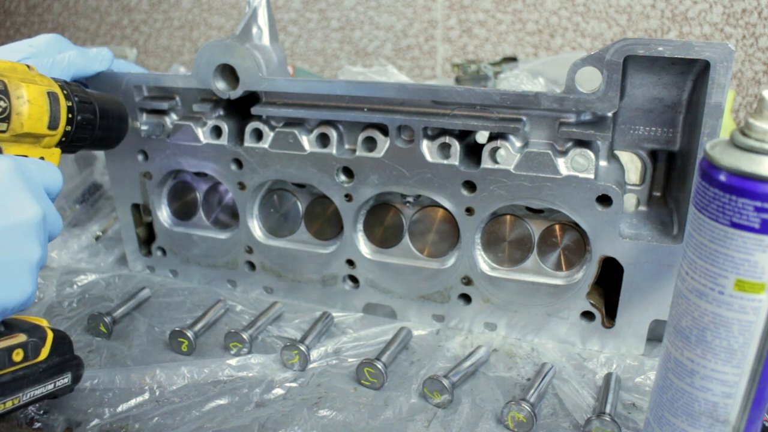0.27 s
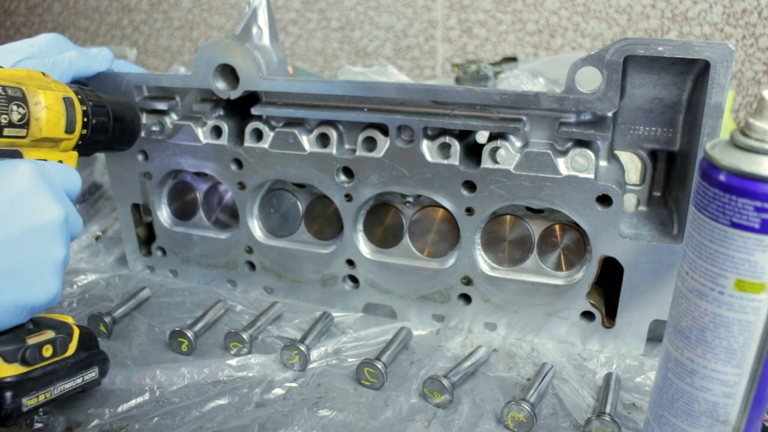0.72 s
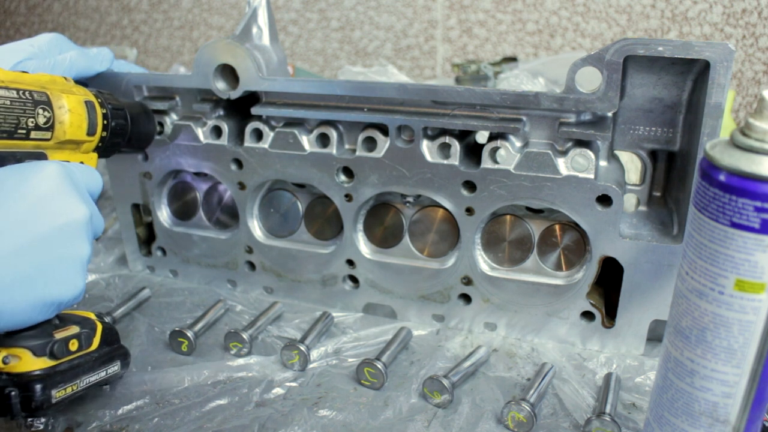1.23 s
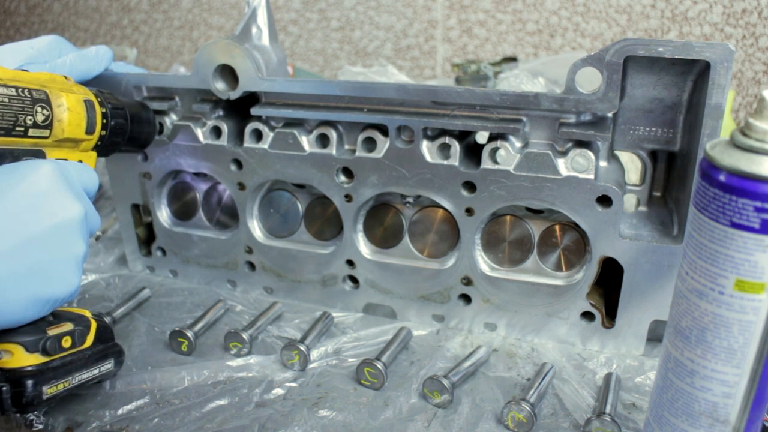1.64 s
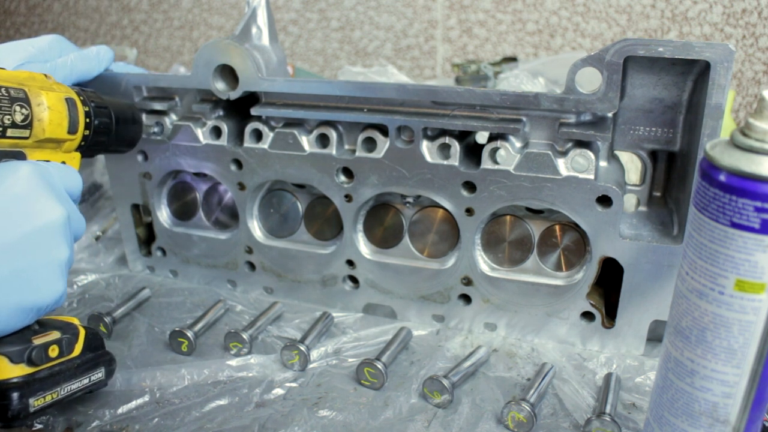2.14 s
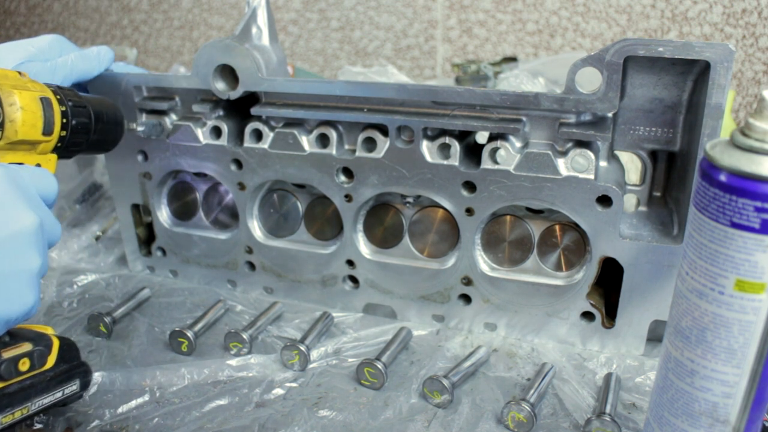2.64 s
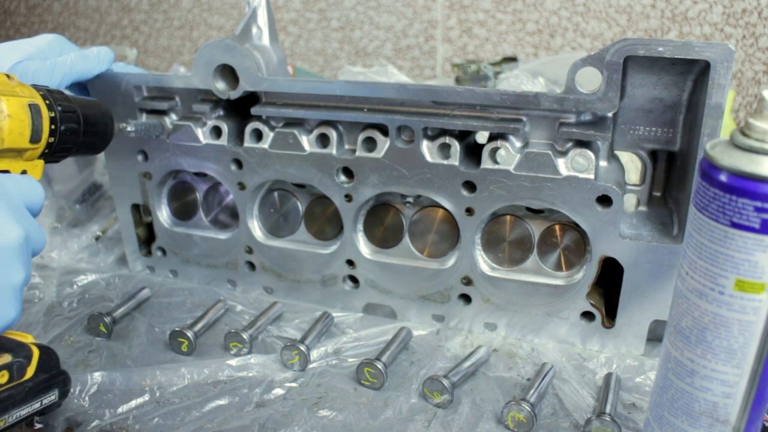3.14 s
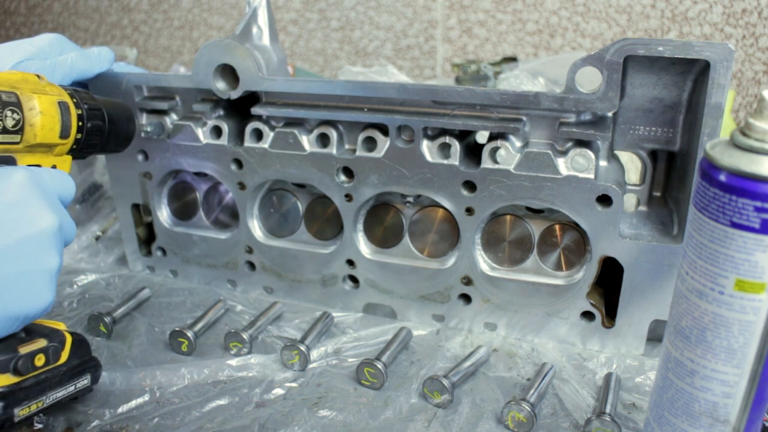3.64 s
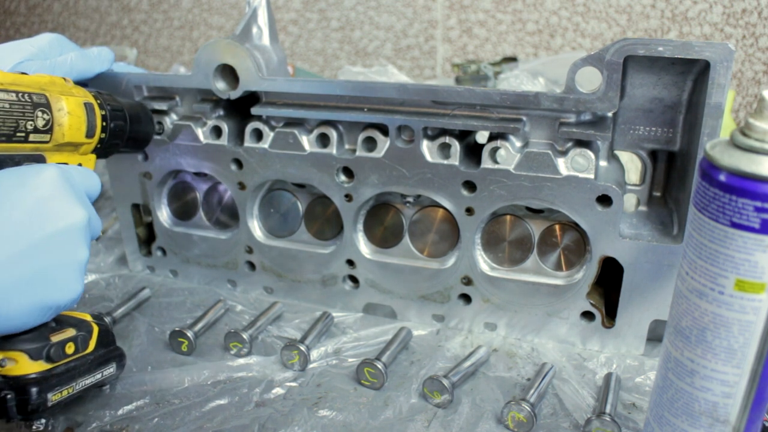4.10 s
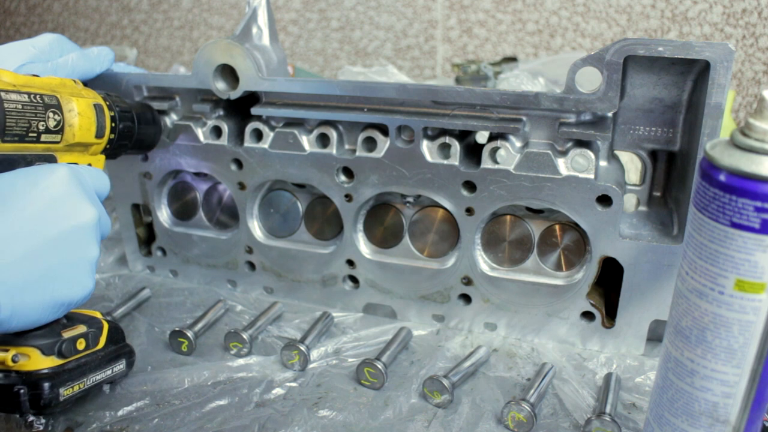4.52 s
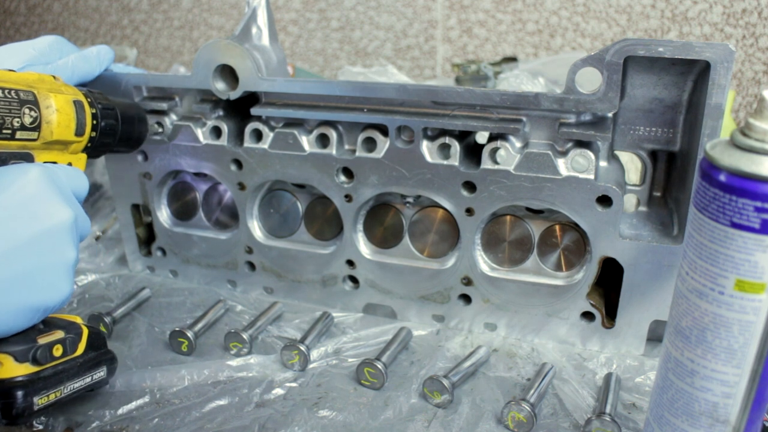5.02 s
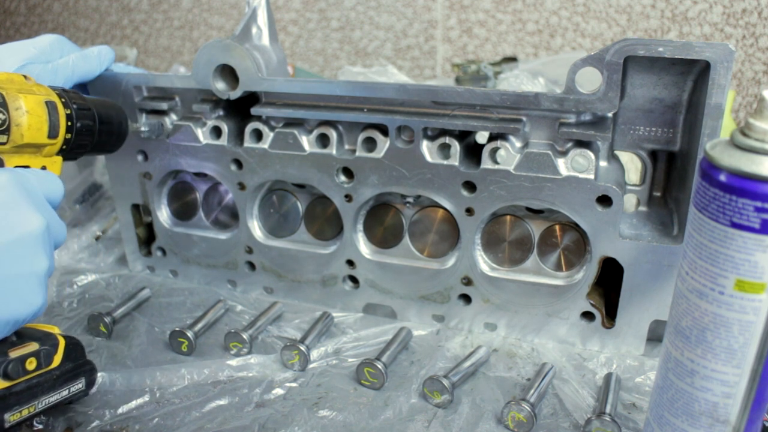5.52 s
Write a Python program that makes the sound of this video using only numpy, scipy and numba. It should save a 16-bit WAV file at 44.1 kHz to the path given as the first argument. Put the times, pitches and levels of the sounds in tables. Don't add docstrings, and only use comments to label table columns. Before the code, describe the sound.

Close microphone on a small electric drill in a quiet workshop. Motor and gears give a buzzing, slightly fluttering high whine over scratchy bristle and fan hiss. There is a quick rev at the start, faint airy whistles as the brush slides, a short drop in speed just after the middle with rougher motor scrape, then a steady run, cut off while still going.

```python
import sys
import numpy as np
from scipy import signal
from scipy.fft import rfft, irfft
from scipy.io import wavfile
from scipy.ndimage import uniform_filter1d
from numba import njit

SR = 44100
rng = np.random.default_rng(int(sys.argv[2]) if len(sys.argv) > 2 else 0)


def waveform_to_disk(signal):
    frames = np.transpose(np.atleast_2d(signal))
    scaled = np.clip(frames, -1, 1) * 32767
    samples = np.round(scaled).astype(np.int16)
    wavfile.write(sys.argv[1], SR, samples)


def convert_level_to_amplitude(level_db):
    exponent = np.asarray(level_db, float) / 20
    return 10 ** exponent


N = 253910
BLOCK = 128
PLANET = .2133

# time_s, shaft_turns_per_s
RUNNING_SPEED = [(0, 184.3), (1.25, 184), (1.53, 191.2), (1.82, 196.5), (2.05, 197.9), (2.42, 204.5),
                 (2.63, 197.7), (2.88, 207.3), (3.46, 193.1), (3.67, 203.2), (4.17, 202), (4.53, 205.4),
                 (4.69, 199.4), (5.02, 191.8), (5.32, 192.8), (5.5, 195.9), (5.66, 195.8), (5.76, 200.2)]
# time_s, extra_turns_per_s
SPIN_UP = [
    (0, -54),
    (.13, -57),
    (.178, 3),
    (.215, 3),
    (.25, 57),
    (.28, 67),
    (.385, 68),
    (.43, 44),
    (.54, 18.5),
    (.67, 0),
]
# time_s, armature_db, gear_db, pole_whine_db, bristle_db
DRIVE = [(0, -6, -5, -70, -46.5), (.11, -5, -2, -68, -45), (.18, -4, 3, -50, -41.5),
         (.3, 0, 1, -56.5, -39.5), (.45, -1, -1, -46, -41.5), (.7, 1.5, 6, -52, -44),
         (1.25, 0.5, 3, -52.5, -44), (1.5, 3, 2, -48, -43.5), (2.0, 3, 3.5, -47.5, -42.5),
         (2.45, 2, 4.5, -49.5, -42.5), (2.75, 2.5, 1, -48, -44.5), (3.0, 2, -9.5, -48.5, -44.5),
         (3.2, -4, -5.5, -59.5, -46.5), (3.45, 1, 1, -47.5, -44), (3.8, 4, 5, -47, -44),
         (4.62, 4, 1, -45.5, -45), (5.2, 1, 3, -51, -43), (5.76, 0.5, 0, -47, -44.5)]
# time_s, touching_share
CONTACT = [
    (0, .45),
    (.2, .3),
    (.7, 1),
    (2.72, 0.92),
    (2.82, .1),
    (3.1, 0),
    (3.32, .1),
    (3.45, 0.68),
    (3.9, 1),
]
# multiple; the first is the pole whine, whose level_db follows DRIVE
LOUD_MULTIPLES = [3, 6, 12, 25, 10.82, 11.46, 22.28]
LOUD_DB = [0, -66, -63, -67, -67, -65, -64.5]
LOUD_RATTLE = [.08, 0.8, 0.2, 0.2, 0.12, 0.12, 0.6]
# multiple, level_db
ARMATURE = [(1.0, -76), (2.0, -76.5), (4.0, -69.5), (5.0, -72), (7.0, -74), (8.0, -69), (9.0, -69),
            (10.0, -73.5), (13.0, -66.5), (15.0, -69.5), (16.0, -71.2), (17.0, -76.0), (18.0, -66),
            (21.0, -72), (23.0, -74.4), (24.0, -73.5), (26.0, -74.7), (27.0, -72.5), (28.0, -70),
            (29.0, -71.8), (30.0, -81), (31.0, -66.5), (33.0, -72.1), (36.0, -76), (37.0, -77), (40.0, -78),
            (54.0, -80.1), (57.0, -81.1), (58.0, -83), (60.0, -77.0)]
# multiple, level_db
GEARS = [(2.27, -79.5), (2.82, -80), (3.1, -67), (3.18, -73.5), (6.2, -66.5), (10.46, -74.0),
         (21.64, -67.5), (33.74, -76), (34.4, -76)]
# centre_hz, width_hz, peak_db
CASE_RING = [(605, 40.0, 3.0), (1180.4, 25.0, 8.5), (1993, 69, 10.5), (2160.0, 168, 8.0), (2370, 98, 5.5),
             (3140, 160.0, 6.0), (3454.0, 140, 5.5), (4420, 230, 4.0), (4940, 672.0, 9.0),
             (5170, 28.0, 8.5), (5343.0, 64.0, 7.0), (5434.0, 160, 5.5), (5880, 250, 6.5), (6700, 144.0, 7)]
# centre_s, half_length_s, multiple, change_db
MULTIPLE_SHIFTS = [(0.0, 0.18, 15.0, 15.5), (0.2, 0.28, 25.0, -12), (0.35, 0.12, 3.18, 8),
                   (0.4, 0.17, 22.28, -6), (0.6, 0.1, 12.0, -14), (0.9, 0.18, 25.0, 8), (1.0, 0.2, 3.0, -7),
                   (1.1, 0.3, 11.46, 5.5), (1.1, 0.3, 15.0, 3), (2.5, 0.18, 18.0, -14), (2.6, 0.3, 21.64, 9.5),
                   (2.85, 0.2, 26.0, 7), (2.85, 0.32, 13.0, -14), (3.05, 0.1, 12.0, -12), (3.05, 0.14, 3.1, 15),
                   (3.15, 0.46, 11.46, -12), (3.7, 0.5, 26.0, -9), (3.95, 0.3, 23.0, 7), (3.95, 0.26, 28.0, -9),
                   (4.0, 0.5, 6.0, -15), (4.25, 0.2, 21.64, -14), (4.3, 0.3, 24.0, 5), (4.35, 0.18, 8.0, -14),
                   (4.75, 0.19, 10.0, -16), (4.8, 0.26, 11.46, 4), (4.8, 0.3, 23.0, -14), (5.1, 0.44, 12.0, 4),
                   (5.15, 0.18, 10.82, -9), (5.35, 0.3, 22.28, 5), (5.55, 0.092, 11.46, -14), (5.35, .4, 9, -9),
                   (4.45, .3, 7, -6), (4.1, .15, 10, -7), (5.1, .4, 15, -7), (3.5, .1, 15, -9), (.3, .1, 9, -7),
                   (1.0, .3, 6, -6), (5.0, .7, 8, 4), (1.6, .25, 22.28, -5), (5.6, .2, 6, -5),
                   (.15, .2, 11.46, -6), (3.2, .15, 25, -7), (.25, .04, 3, 6), (5.65, .15, 21.64, 5),
                   (3.6, .2, 24, -6)]
# centre_s, half_length_s, multiple, change_db
MULTIPLE_SWELLS = [(.33, .05, 3, -6), (2.92, .15, 25, -4), (.6, .1, 6, -10), (.95, .35, 10.82, 2),
                   (1.5, .4, 4, -11), (2.25, .2, 6, 1), (1.75, .3, 11.46, 4), (2.0, .3, 10, -8),
                   (2.0, .2, 27, -8), (2.4, .35, 22.28, 3), (2.85, .12, 6, 2), (2.9, .25, 33, -8),
                   (2.9, .2, 26, -5), (2.9, .2, 18, -8), (0, .13, 2, -11), (2.6, .4, 1, -5), (3.4, .1, 12, 3),
                   (3.21, .08, 6, 7), (3.2, .15, 9, 10), (3.2, .2, 31, -8), (3.25, .2, 2, -8),
                   (.35, .15, 1, -2), (0, .12, 3, -5), (3.25, .035, 3, -8), (3.08, .04, 3, 4),
                   (.7, .4, 33, -4), (1.0, .3, 3.1, -6), (3.07, .14, 3.1, -10), (4.55, .35, 22.28, -4),
                   (0, .15, 2.27, -12), (0, .15, 2.82, -10), (1.06, .025, 3, -8), (1.26, .025, 3, -9),
                   (1.46, .035, 3, 3), (1.54, .02, 3, -5), (.62, .02, 3, -5), (1.1, .35, 28, 5),
                   (1.7, .2, 8, 5), (3.5, .1, 22.28, 2), (3.9, .3, 29, -6), (1.0, .25, 24, -7),
                   (4.96, .025, 3, -9), (5.37, .03, 3, -8), (0, .13, 1, -11)]
# centre_s, half_length_s, multiple, level_db
PASSING = [(0, .13, 9, -60), (.05, .08, 10.75, -59), (0, .12, 18, -60), (0, .13, 22.5, -56),
           (0, .12, 26, -59), (0, .13, 33, -61), (0, .12, 40, -61), (0, .12, 41.6, -60), (.03, .06, 6, -62),
           (.06, .08, 7, -64), (.24, .03, 4, -58), (.33, .06, 6, -57), (.29, .05, 19, -51),
           (.35, .05, 20, -52), (.34, .07, 9, -54), (.42, .09, 12, -55), (.5, .08, 9, -56),
           (.56, .06, 21, -56), (.78, .16, 31, -55), (.62, .1, 25, -55), (.75, .1, 29, -55),
           (.65, .08, 16, -60), (.45, .08, 7, -59), (.2, .04, 22.28, -55), (.33, .06, 11.46, -53),
           (.46, .07, 11.46, -54), (2.86, .09, 26, -54), (2.9, .1, 29, -55), (2.8, .1, 31, -61),
           (3.0, .07, 28, -55), (3.02, .06, 18, -60), (2.95, .14, 7, -57), (3.0, .07, 8, -60),
           (2.98, .06, 23, -61), (3.03, .05, 31, -60), (3.09, .05, 30, -61), (3.2, .14, 9, -58),
           (3.26, .06, 15, -58), (3.22, .07, 10.78, -61), (3.25, .06, 13.2, -61), (3.25, .06, 36, -62),
           (3.2, .08, 4, -62), (3.15, .05, 34, -62), (3.33, .04, 32, -61), (3.41, .05, 28, -58),
           (3.44, .09, 31, -58), (3.44, .06, 18, -59), (3.37, .05, 11, -51), (3.4, .06, 10, -57)]
# centre_s, half_length_s, multiple, level_db
LASTING = [(1.1, .4, 19, -59), (1.1, .18, 35, -63), (1.0, .4, 38, -68), (1.05, .45, 28, -52),
           (1.4, .45, 31, -55), (2.2, .4, 31, -60), (1.05, .35, 25, -53), (1.95, .6, 25, -51),
           (.9, .3, 29, -57), (.92, .16, 18, -54), (.3, .08, 21, -54), (.4, .06, 22.28, -52),
           (3.12, .08, 8, -60), (3.1, .06, 33, -61), (1.7, .4, 27, -56), (1.2, .3, 47, -70),
           (2.0, .2, 40, -67), (2.3, .35, 34, -65), (2.4, .2, 60, -67), (2.55, .25, 9, -59),
           (1.7, .2, 26, -56), (2.1, .2, 23, -57), (2.1, .4, 68, -73), (3.9, .3, 34, -60),
           (4.4, .25, 32, -63), (4.35, .2, 57, -64), (4.2, .3, 60, -65), (4.5, .18, 54, -65),
           (4.2, .4, 24, -54), (4.4, .25, 22, -58), (4.2, .6, 29, -55), (4.1, .5, 31, -59),
           (4.9, .4, 25, -54), (3.9, .3, 19, -61), (4.0, .3, 66, -73), (4.7, .25, 18, -55),
           (4.6, .25, 35, -66), (5.3, .55, 31, -54.5), (5.2, .16, 10, -57), (5.0, .25, 28, -55),
           (5.6, .2, 28, -56), (5.0, .3, 41, -69), (4.8, .3, 26, -55)]
# time_s, level_db
SCRAPE = [(0, -62), (.25, -53), (.5, -57), (.7, -64), (2.7, -61), (2.8, -52), (2.95, -50.5), (3.08, -52),
          (3.2, -56), (3.4, -56), (3.6, -61), (4.5, -57), (4.7, -57), (5.76, -66)]
# pitch_hz, level_db
HISS_COLOUR = [(35, -52), (60, -31), (107, -31), (216, -25.5), (320, -30.5), (500, -20.5), (740, -18.5),
               (1360, -15.5), (2260, -9.5), (2850, -11), (5350, -11), (7500, -18), (10000, -23),
               (13000, -19.5), (15700, -23.5)]
# centre_hz, width_hz, peak_db
CASE_MODES = [(160, 19, 4.5), (224.4, 8.9, 8), (602, 140, 5.5), (1194, 29, 6.5), (1280, 120, 3.5),
              (2006, 260, 5), (3300, 490, 1), (4470, 180, 1), (5330, 480, 2), (6630, 120, 2),
              (12200, 1000, -1)]
# centre_hz, width_hz, peak_db
FREE_RING = [(320, 160, -5), (620, 200, 4), (1050, 250, -3), (4300, 1100, -3), (5450, 800, 2.5)]
# centre_hz, control (1 hum, 2 case, 3 fizz), share
HISS_BANDS = [(120, 1, 1), (260, 3, .8), (500, 0, 1), (2500, 0, 1), (4000, 2, 1), (5600, 2, .3),
              (8200, 3, 1.3), (10500, 3, 1.3), (12000, 3, .1)]
# start_s, length_s, start_hz, end_hz,
# level_db
WHISTLES = [(0, 0.14, 1945, 1925, -56), (.205, .09, 1850, 2380, -40), (0.36, .11, 5500, 5000, -42.5),
            (0.26, .16, 4700, 5050, -44.5), (.17, .075, 4050, 4550, -54), (.235, .13, 5250, 5750, -46),
            (.28, .14, 2800, 2980, -47.5), (0.385, 0.11, 2160, 1990, -42.5), (.5, .1, 3050, 3300, -52),
            (.54, .09, 4450, 4150, -48), (.68, 0.75, 3470, 3600, -57), (.697, .1, 7450, 7450, -52),
            (.75, .34, 3350, 3250, -48.5), (1.06, .12, 1550, 1350, -61), (1.18, .126, 1320, 1133, -48.5),
            (2.55, .14, 2980, 2640, -50), (2.685, .13, 2520, 2250, -47), (2.783, .17, 11200, 11150, -61),
            (3.13, .16, 1374, 1318, -62), (3.531, 0.22, 2730, 3370, -51.5), (4.095, .15, 1400, 1120, -50.5),
            (5.43, .27, 3620, 2450, -52), (5.68, .074, 2450, 2390, -44.5), (.19, .35, 232, 230, -68),
            (1.95, .6, 230, 231, -73), (3.75, .85, 231, 231, -71), (5.05, .4, 230, 229, -70)]
# pitch_hz, level_db
STEADY = [
    (50, -77.5),
    (7802, -73),
]
# centre_s, low_hz, high_hz
SIDE_PATCHES = [(.125, 13800, 15700), (.752, 11020, 12400), (.799, 4650, 5680), (1.077, 7580, 8960),
                (1.286, 5680, 6890), (1.333, 8270, 9650), (1.333, 13800, 15160), (2.61, 6300, 7580),
                (2.935, 8270, 9650), (2.935, 10340, 12400), (2.935, 13090, 14470), (3.701, 7580, 8960),
                (4.56, 4220, 5170), (5.0, 14470, 15700)]


def evened(x):
    return x / np.sqrt(np.mean(abs(x) ** 2) + 1e-20)


def curves(rows, t):
    s, *columns = np.transpose(rows)
    return np.array([np.interp(t, s, c) for c in columns])


def resonance_db(hz, modes):
    return sum(peak_db / (1 + (2 * (hz - at) / width) ** 2) for at, width, peak_db in modes)


def wander(hz, count):
    steps = N // BLOCK + 2
    z = rfft(rng.standard_normal((count, steps))) / (1 + (np.fft.rfftfreq(steps, BLOCK / SR) / hz) ** 4)
    return evened(irfft(z, steps))


def control_times():
    return np.arange(N // BLOCK + 2) * BLOCK / SR


def fine(row):
    return np.interp(np.arange(N) / BLOCK, np.arange(len(row)), row)


def shaft_hz(t):
    sag_s, sag_turns_per_s, fall_s, rise_s, shape = 3.239, 51.55, .192, .13, 2.335
    inertia_s = .024
    since = t - sag_s
    sag = sag_turns_per_s * np.exp(-abs(since / np.where(since < 0, fall_s, rise_s)) ** shape)
    span = max(round(inertia_s / (t[1] - t[0])), 1)
    return uniform_filter1d(curves(RUNNING_SPEED, t)[0] + curves(SPIN_UP, t)[0] - sag, size=span)


def shaft_turns(count=N):
    return np.cumsum(shaft_hz(np.arange(count) / SR)) / SR


@njit
def sing_all(turns, multiples, swings):
    out = np.zeros(len(turns))
    for step in range(len(turns) // BLOCK - 1):
        first = step * BLOCK
        start = turns[first]
        pace = (turns[first + BLOCK] - start) / BLOCK
        for j in range(len(multiples)):
            arm = np.exp(2j * np.pi * (multiples[j] * start % 1))
            turn = np.exp(2j * np.pi * multiples[j] * pace)
            change = (swings[step + 1, j] - swings[step, j]) / BLOCK
            for i in range(BLOCK):
                out[first + i] += ((swings[step, j] + i * change) * arm).real
                arm *= turn
    return out


def whine(flutter_db=1.0, drift_db=1.5, planet_beat=.24, slack=.13, weak_rattle=0.13, glide_db=0.01, trim_db=2.0):
    t = control_times()
    speed = shaft_hz(t)
    armature_db, gear_db, pole_db, _ = curves(DRIVE, t)
    loud = list(zip(LOUD_MULTIPLES, LOUD_DB))
    weak_armature = [(round(k), db) for k, db in ARMATURE]
    multiples, own_db = np.transpose(loud + weak_armature + list(GEARS))
    geared = abs(multiples - multiples.round()) > .05
    level_db = own_db[:, None] + trim_db + np.where(geared[:, None], gear_db, armature_db)
    level_db[0] = pole_db
    level_db = level_db + resonance_db(np.outer(multiples, speed), CASE_RING)
    for s, half, multiple, db in list(MULTIPLE_SHIFTS) + list(MULTIPLE_SWELLS):
        level_db[np.argmin(abs(multiples - multiple))] += db * np.exp(-((t - s) / half) ** 2)
    handover_db = -14
    for s, half, multiple, _ in list(PASSING) + list(LASTING):
        level_db[abs(multiples - multiple) < .05] += handover_db * np.exp(-((t - s) / half) ** 4)
    weak = np.arange(len(multiples)) >= len(LOUD_DB)
    level_db = level_db + drift_db * weak[:, None] * wander(1.5, count=len(weak))
    gliding = uniform_filter1d(abs(np.gradient(speed, t)), size=60)
    level_db = level_db - glide_db * np.outer(weak * np.clip(multiples / 12 - .7, 0, 1), gliding)

    play = np.sqrt(multiples / 12)[:, None]
    count = len(play)
    rattle_share = np.r_[LOUD_RATTLE, np.full(weak.sum(), weak_rattle)][:, None]
    sing = convert_level_to_amplitude(flutter_db * play * wander(16, count=count))
    phase = slack * play * wander(16, count=count) + 2 * np.pi * rng.random(play.shape)
    sing = sing * np.exp(1j * phase)
    rattle = wander(51, count=count) + 1j * wander(79, count=count)
    swings = convert_level_to_amplitude(level_db) * (sing + rattle_share * rattle)
    turns = shaft_turns(count=len(t) * BLOCK)
    swings = swings * (1 + planet_beat * np.outer(geared, np.cos(2 * np.pi * PLANET * turns[::BLOCK])))
    return np.sqrt(2) * sing_all(turns, multiples, np.ascontiguousarray(swings.T))[:N]


def singers(flutter_db=1.7):
    t = control_times()
    s, half, multiples, db = np.transpose(list(PASSING) + list(LASTING))[:, :, None]
    size = convert_level_to_amplitude(db + flutter_db * wander(22, count=len(s)))
    size = size * np.exp(-((t - s) / half) ** 4 + 2j * np.pi * rng.random(s.shape))
    turns = shaft_turns(count=len(t) * BLOCK)
    return np.sqrt(2) * sing_all(turns, multiples[:, 0].copy(), np.ascontiguousarray(size.T))[:N]


def scrape(spread_db=3.0, tilt_db=-2.0, shift_db=5, peak_db=5.5):
    k = np.arange(7, 70)
    angle = np.linspace(0, 1, 4097)
    place = shaft_turns() % 1
    out = 0
    for shift in wander(7, count=3):
        db = spread_db * rng.standard_normal(len(k)) + tilt_db * (k - 26) / 10
        db = db + peak_db * np.exp(-((k - 27) / 5) ** 2)
        bumps = evened(convert_level_to_amplitude(db) @ np.cos(2 * np.pi * (np.outer(k, angle) + rng.random((len(k), 1)))))
        out = out + fine(convert_level_to_amplitude(shift_db * shift)) * np.interp(place, angle, bumps)
    return convert_level_to_amplitude(curves(SCRAPE, np.arange(N) / SR)[0]) * evened(out)


def hiss(patchy_db=1.4, throb=0.045, trim_db=-2.5, flicker_db=0.47):
    frames, hz = N // 256 + 5, np.fft.rfftfreq(1024, 1 / SR)
    a, b, patches = rng.standard_normal((frames, 513, 3)).T
    patches = evened(uniform_filter1d(uniform_filter1d(patches, 9, axis=0), 22, axis=1))
    f, db = np.transpose(HISS_COLOUR)
    colour = np.interp(np.log(hz + 1), np.log(f + 1), db) + resonance_db(hz, CASE_MODES)

    t = np.arange(frames) * 256 / SR
    level, touch, over = curves(DRIVE, t)[-1], curves(CONTACT, t)[0], curves(SPIN_UP, t)[0]
    # clear_db, gained_on_contact_db, db_per_turn over and under running speed
    hum, case, fizz = (-5, 7, -.14, -.1), (-4.5, 5.5, .01, -.03), (-7, 7.5, .075, .05)
    control_db = np.array([clear + gained * touch + np.where(over > 0, racing, -idling) * over
                           for clear, gained, racing, idling in (hum, case, fizz)])
    strokes_per_s, stroke_s, stroke_db = 1.097, 0.93, 0.4
    control_db[1] += stroke_db * np.cos(2 * np.pi * strokes_per_s * (t - stroke_s))
    centre, control, share = np.transpose(HISS_BANDS)
    blend = [np.interp(np.log(hz + 1), np.log(centre), share * (control.round() == k)) for k in (1, 2, 3)]

    band = (hz > 1400) & (hz < 3200)
    scale = np.sqrt(np.sum(convert_level_to_amplitude(colour) ** 2) / np.sum(convert_level_to_amplitude(colour[band]) ** 2))
    z = (a + 1j * b) * convert_level_to_amplitude(colour[:, None] + patchy_db * patches)
    scale = scale / np.sqrt(np.mean(signal.istft(z, nperseg=1024, noverlap=768)[1] ** 2))
    z = z * convert_level_to_amplitude(level + np.transpose(blend) @ control_db + trim_db)
    z = z * convert_level_to_amplitude(np.outer(resonance_db(hz, FREE_RING), 1 - touch))
    flicker = evened(uniform_filter1d(rng.standard_normal(frames), size=7))
    z = z * convert_level_to_amplitude(flicker_db * np.outer(np.clip(hz / 6000 - .5, 0, 1), flicker))
    turns = shaft_turns()
    beat = sum(np.cos(2 * np.pi * k * turns) for k in (PLANET, .64, 1))
    return scale * signal.istft(z, nperseg=1024, noverlap=768)[1][:N] * (1 + throb * beat)


def bore():
    width_hz, breathy_hz, breathy_span_hz, breathy_width_hz = 75, 5600, 2400, 420
    out = np.zeros(N + SR)
    for s, length, start_hz, end_hz, db in WHISTLES:
        breathy = 1 / (1 + (2 * (start_hz - breathy_hz) / breathy_span_hz) ** 2)
        width = width_hz * min(1, .28 / length) + breathy_width_hz * breathy ** 2
        noise = rng.standard_normal((SR, 2)) @ [1, 1j]
        r = np.exp(-np.pi * width / SR)
        n = round(length * SR)
        two_poles = np.convolve([1, -r], [1, -r])
        fuzz = evened(signal.lfilter([1], two_poles, noise[:n + 2000])[2000:])
        turns = np.cumsum(np.linspace(start_hz, end_hz, n)) / SR
        tone = ((1 + width / 125 * fuzz) * np.exp(2j * np.pi * turns)).real
        out[round(s * SR):][:n] += convert_level_to_amplitude(db) * evened(tone) * signal.windows.tukey(n, .55)
    return out[:N]


def electrics():
    t = np.arange(N) / SR
    out = np.zeros(N)
    for (hz, db), sway_db in zip(STEADY, 2.2 * wander(8, count=len(STEADY))):
        out += np.sqrt(2) * convert_level_to_amplitude(db + fine(sway_db)) * np.sin(2 * np.pi * hz * t)
    return out


def scene():
    mono = whine() + singers() + scrape() + hiss() + bore() + electrics()
    return np.tile(mono, (2, 1))


def top_cut(x):
    return signal.sosfilt(signal.butter(12, 16230, fs=SR, output="sos"), x)


def record(dry):
    edge_hz, side_db = 15740, -4
    low_pass = signal.firwin(1023, edge_hz, window=("kaiser", 9), fs=SR)
    mono = signal.oaconvolve(dry[0], low_pass, "same")
    side, hz = np.zeros(N), np.fft.rfftfreq(2048, 1 / SR)
    fade = signal.windows.kaiser_bessel_derived(2048, 4 * np.pi)
    for s, low_hz, high_hz in SIDE_PATCHES:
        patch = slice(round(s * SR) - 1024, round(s * SR) + 1024)
        size = abs(rfft(mono[patch])) * (hz > low_hz) * (hz < high_hz)
        noise = irfft(size * np.exp(2j * np.pi * rng.random(len(hz))))
        side[patch] += convert_level_to_amplitude(side_db) * noise * fade
    return top_cut(np.array([mono + side, mono - side]))


dry = scene()
out = record(dry)
waveform_to_disk(out)
```